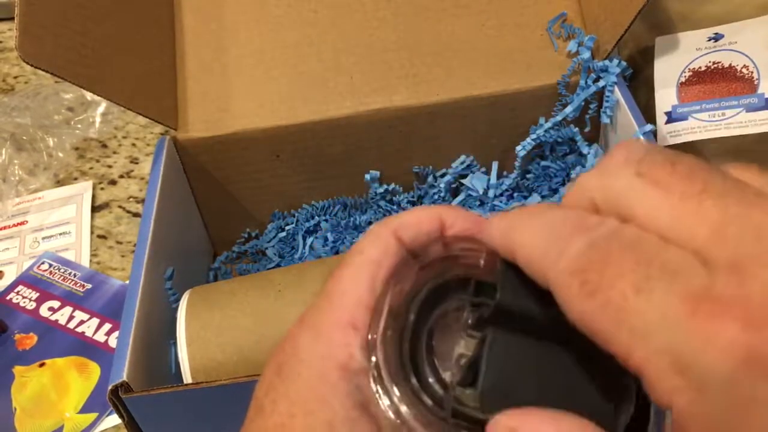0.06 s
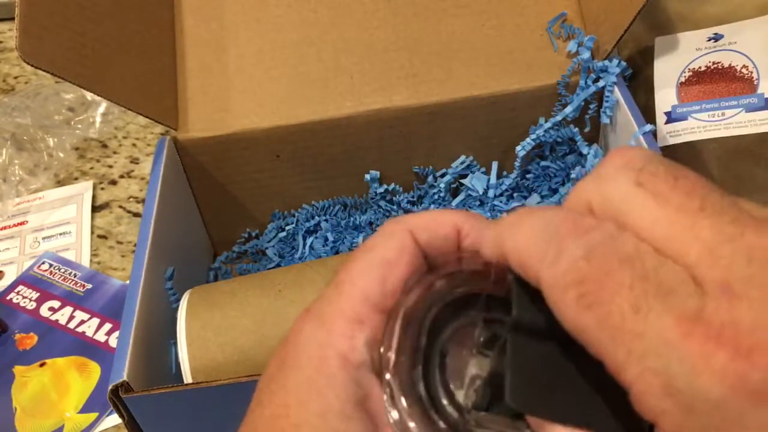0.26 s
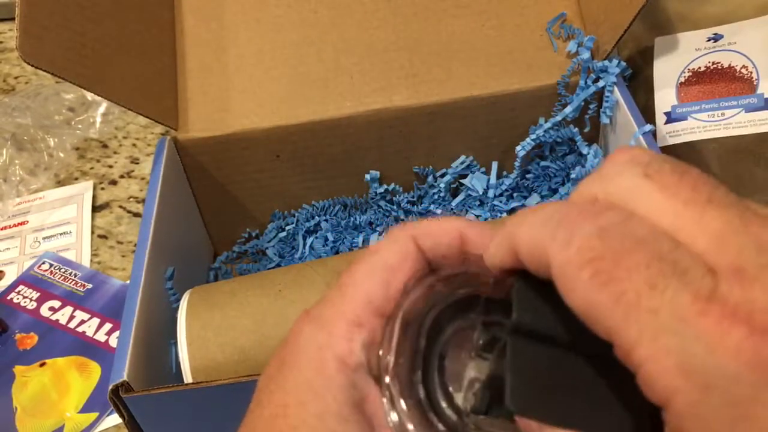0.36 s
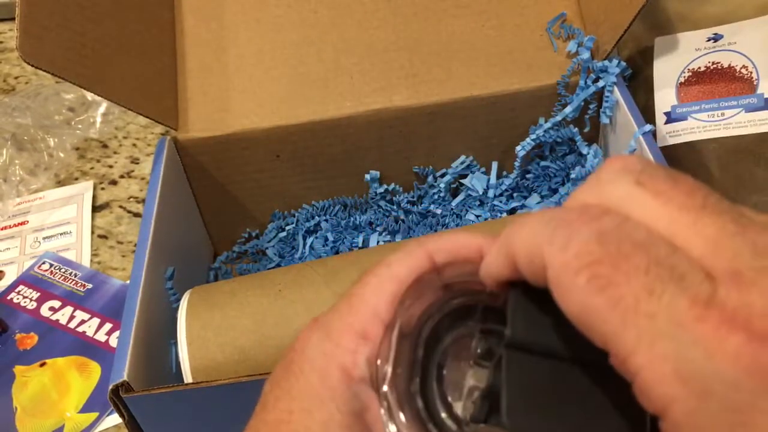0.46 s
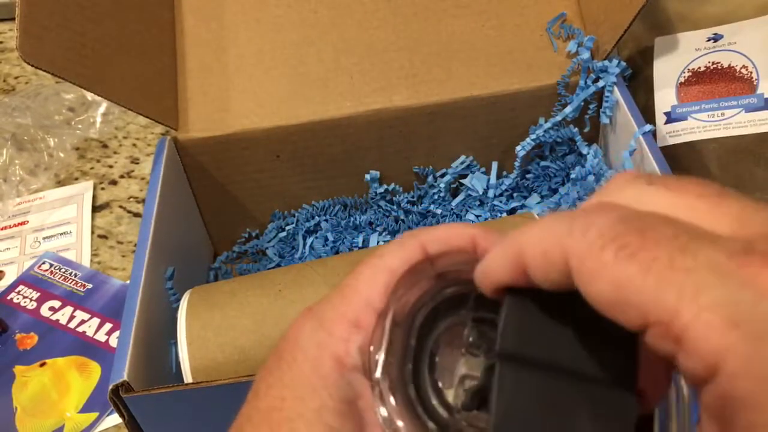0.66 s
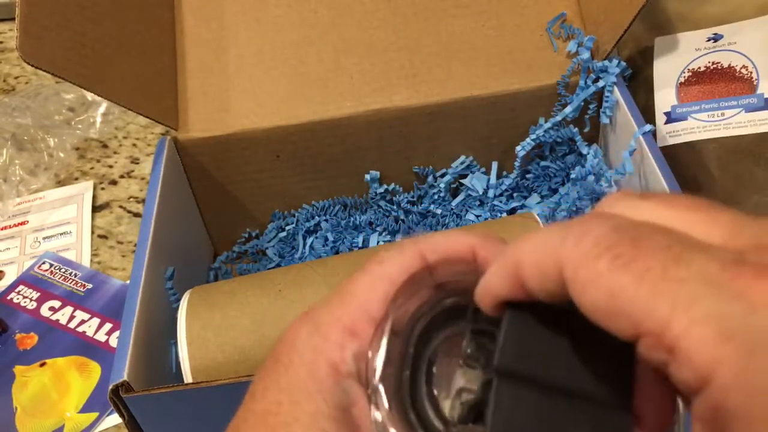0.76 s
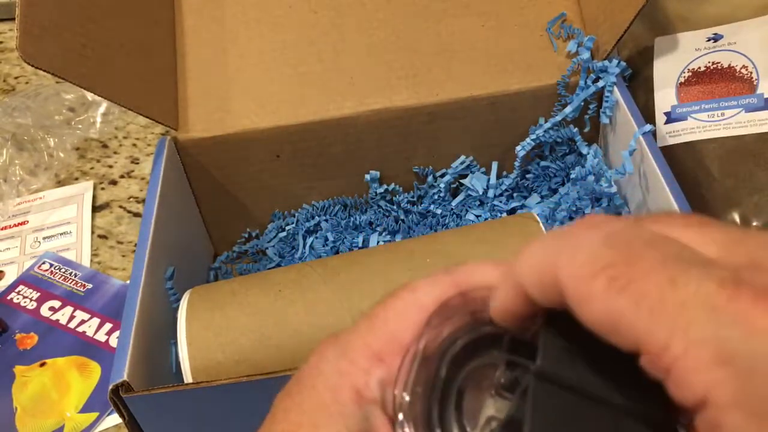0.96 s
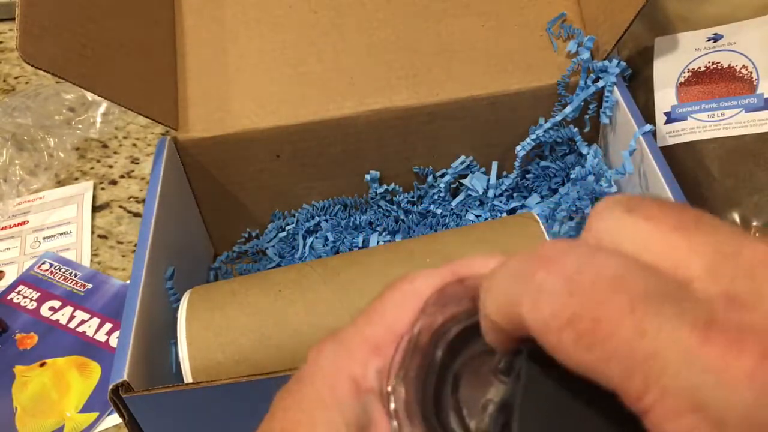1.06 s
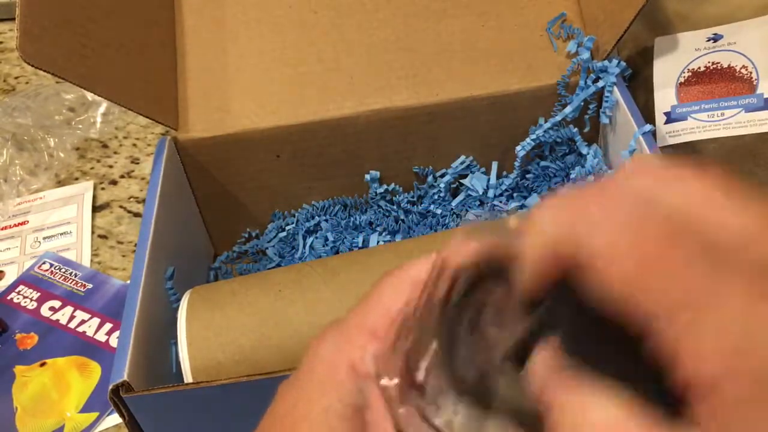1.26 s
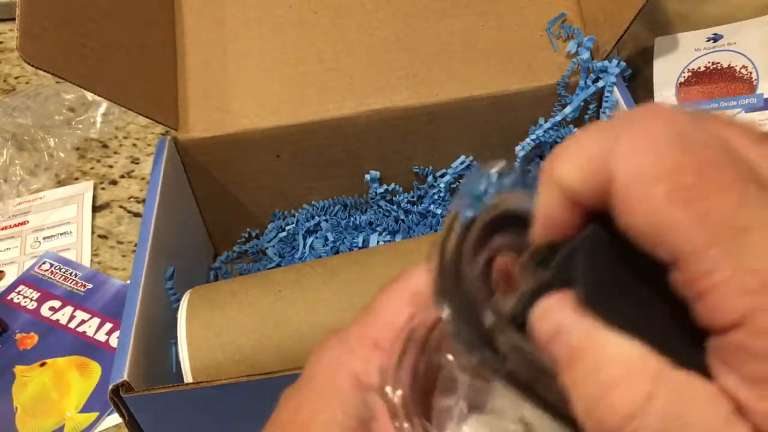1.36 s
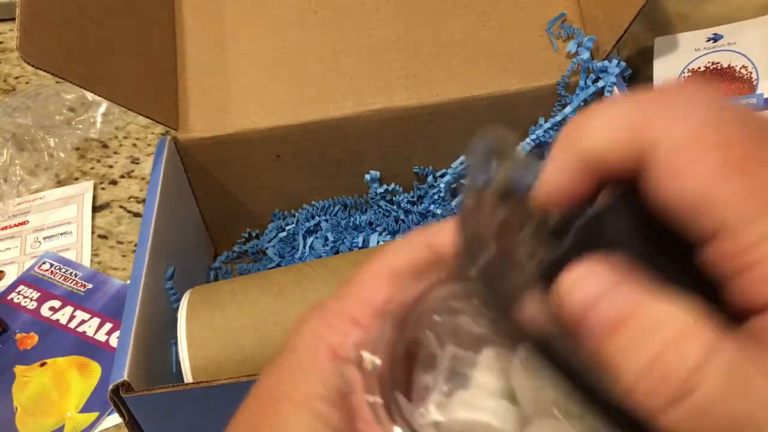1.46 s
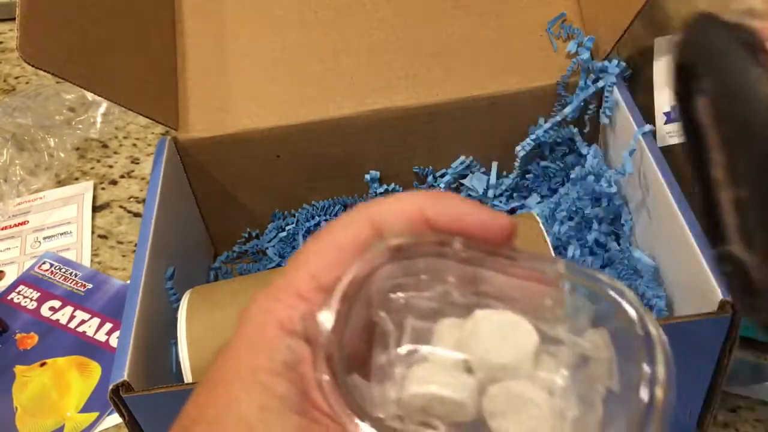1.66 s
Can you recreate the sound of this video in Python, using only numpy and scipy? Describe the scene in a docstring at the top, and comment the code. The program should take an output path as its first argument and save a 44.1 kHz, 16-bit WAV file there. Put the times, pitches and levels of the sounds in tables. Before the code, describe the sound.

A small plastic tub is opened by hand: faint ticks, one loud sharp snap, sparse clicks and a tiny creak, then rubbing and rattling as the lid comes off, close to the microphone in a quiet furnished room.

```python
"""First a soft rub and faint ticks, then one loud snap: hands work the lid off a small plastic tub, close up.
After the snap the lid ticks and creaks on its rim, then comes away with rubbing and rattling.
Snap, ticks and creak are short pushes that ring the modes of tub and lid; rubbing feeds the same modes
with dense random slips. Decaying noise makes the echo of a quiet furnished room, over hum and faint hiss."""
import sys
import numpy as np
from scipy import signal
from scipy.io import wavfile

SR = 44100
rng = np.random.default_rng(int(sys.argv[2]) if len(sys.argv) > 2 else 0)


def unload_wav(signal):
    """Save mono or channel-first audio to the path in sys.argv[1] as 16-bit WAV at rate SR, clipped to [-1, 1]."""
    wavfile.write(
        sys.argv[1],
        SR,
        np.round(np.clip(np.atleast_2d(signal).T, -1, 1) * 32767).astype(np.int16),
    )


N = 74970  # length [samples]

# The lid's catch snaps loose and rebounds:
# (time [s], drive of the five mode groups from low to treble [dB] x 5, favoured pitch [Hz])
SNAP_CONTACTS = [(0.2335, -44.5, -18.5, -16, -14, -17, 3070), (0.2365, -35.5, -23.5, -9.5, -17, -19, 4375),
                 (0.2425, -67, -25.5, -32, -25, -40.5, 1370)]
# Tone curve of the snap: (frequency [Hz], boost or cut [dB])
SNAP_COLOUR = [(120, 10.5), (330, 4), (680, -28), (900, -7.5), (1080, 4), (1370, 8), (1550, -5),
               (2000, -13), (3070, -1.5), (3500, 1.5), (4150, -0.5), (6500, -0.5), (8500, 7), (11000, -2)]
# Light ticks and knocks of the lid:
# (time [s], drive of the five mode groups from low to treble [dB] x 5, favoured pitch [Hz])
TICK_CONTACTS = [(0.0241, -89, -46, -37, -39, -51, 3990), (0.032, -77, -48, -35.5, -44, -60, 1570),
                 (0.0366, -45, -61, -47, -48.5, -51.5, 2960), (0.0598, -48.5, -39.5, -50, -75, -67, 460),
                 (0.1288, -55, -48, -49, -45.5, -50, 1000), (0.2099, -50, -45, -54, -48.5, -54, 3140),
                 (0.2215, -60, -52, -52, -52, -57, 8700), (0.287, -46, -41, -57, -74, -78, 288),
                 (0.4978, -50, -24, -22.5, -24, -39.5, 2030), (0.5000, -37.5, -39.5, -36, -32.5, -44, 347),
                 (0.5073, -36, -41.5, -49, -57, -67, 2210), (0.6634, -51.5, -65, -44.5, -43, -54, 1853),
                 (0.7316, -54.5, -63, -35, -43.5, -57, 1445), (0.7492, -50, -70, -41, -44, -58, 2890),
                 (0.803, -65.5, -66, -49, -55.5, -62, 3240), (0.9882, -55.5, -61.5, -50, -61, -71, 3100),
                 (1.161, -50.5, -52, -49, -53, -56.5, 3100), (1.1919, -51.5, -50, -53, -50, -60, 3435),
                 (1.317, -55, -48.5, -45, -48.5, -55, 3520), (1.3328, -47.5, -34, -36, -44.5, -54, 680),
                 (1.3350, -36.5, -55, -49, -40.5, -46.5, 232), (1.3427, -56.5, -38, -52, -41, -50, 680),
                 (1.3814, -64, -33.5, -38, -50.5, -65, 857), (1.3941, -52, -51, -47, -46.5, -44, 1140),
                 (1.4046, -75, -47, -33, -68, -63, 1010), (1.4524, -66, -53, -37, -55, -58, 990),
                 (1.4595, -81, -40, -32.5, -38.5, -43.5, 1290),
                 (1.4926, -46.5, -34, -40, -41.5, -32.5, 4450), (1.6248, -64.5, -50.5, -51, -50, -43, 1350)]
# The lid creaks on the rim, slip by slip: (time [s], level [dB])
CREAK_SLIPS = [(0.947, -46), (0.9598, -46.5), (0.9665, -47), (.972, -51), (0.98, -48)]
# Tone of a creak slip, one value per mode group from low to treble: (offset [dB])
CREAK_COLOUR_DB = [2, -6, 0, -1, -1.5]
# Strokes of skin and lid rubbing on the rim:
# (start [s], length [s], level [dB], tilt about 1 kHz [dB per octave], favoured pitch [Hz])
RUB_STROKES = [(0, 0.055, -55.5, -2, 1570), (0.425, 0.093, -52.5, -6, 1130),
               (0.676, 0.053, -53, -3.5, 2000), (0.711, 0.06, -51, -1, 1400), (0.749, 0.11, -58, -3, 2010),
               (0.843, 0.15, -56, -5, 2730), (0.948, 0.091, -56.5, -3.5, 310),
               (1.033, 0.25, -60.5, -3, 3870), (1.32, 0.043, -40, -4.5, 3460),
               (1.341, 0.054, -46.5, -4, 700), (1.37, 0.074, -40.5, -3, 1050), (1.433, 0.088, -43, -2, 935),
               (1.468, 0.11, -55, -6, 2004), (1.6, 0.055, -50, -3, 1405)]
# Modes of tub and lid: (frequency [Hz], relative strength when struck [dB], t60 [s])
TUB_MODES = [(120, 1.5, 0.011), (232, 5.5, 0.012), (314.8, 10, 0.02), (466.4, 4, 0.007), (680, -6.5, 0.022),
             (868, 0.5, 0.0079), (1033, 1.5, 0.019), (1370, -1.5, 0.01), (1506, 5.5, 0.0056),
             (1846, 3.5, 0.0081), (2246, -1.5, 0.013), (2610, 2, 0.008), (3070, 2, 0.0086),
             (3496, 3, 0.007), (4203, -3, 0.015), (4630, -4.5, 0.0088), (5635, 3.5, 0.0039),
             (6530, -1, 0.0083), (7650, 3, 0.0024), (8730, -2.5, 0.004), (9710, -7.5, 0.0065),
             (11210, -6.5, 0.0056), (12200, -7, 0.0093), (13500, -8.5, 0.0033), (15000, -6, .0025)]
# Borders between the five mode groups: (frequency [Hz])
GROUP_EDGES_HZ = [500, 1150, 2500, 5000]
# Room echo band by band: (frequency [Hz], level [dB], t60 [s])
ROOM_BANDS = [(197, -34, 0.34), (400, -40.5, 0.25), (700, -32.5, 0.19), (1050, -36, 0.32),
              (1340, -31, 0.34), (1655, -40, 0.51), (2420, -32.5, 0.32), (3460, -38.5, 0.4),
              (4466, -38.5, 0.3), (8000, -33.5, 0.27), (11960, -36.5, 0.18), (15000, -28, 0.26)]
# Spectrum of the room tone: (frequency [Hz], relative level per Hz [dB])
FLOOR_SPECTRUM = [(20, -73), (40, -49.5), (58, -9), (80, 4.5), (110, 7.5), (200, -2), (476, -7.5),
                  (677, -23), (1020, -12), (1440, -25.5), (1940, -10.5), (2400, -30.5), (3160, -20.5),
                  (5500, -32.5), (8000, -43.5), (12900, -36), (16000, -68)]

CREAK_PITCH_HZ = 9800  # pitch that the slips favour
MODE_SPREAD_DB = 3  # how much a mode's strength varies from touch to touch
FAVOUR_DB, FAVOUR_OCTAVES = 9.5, 0.2  # lift of the modes nearest a favoured pitch, and its reach
CONTACT_CYCLES = 0.16  # the push on a mode decays with a time constant of half this share of its period
CHATTER_S, CHATTER_DB = 0.0013, -10  # each contact repeats twice: longest gap, level step per repeat
CHATTER_BASS_DB = -15  # extra step for the lowest group: chatter is too light to move it
RUB_PER_S, RUB_SPREAD_DB, RUB_BASS_DB = 36000, 3, -12.5  # slip rate, size spread, lowest group
RUB_RISE = 0.29  # share of a stroke spent swelling
SCATTER_RING = 0.42  # heard from all sides, the snap's modes blur: share of their ring time
CUPPED_DB = -10.5  # the hands shield the small sounds from the room
ROOM_ONSET_S = 0.002  # time constant of the echo's swell
LATE_DB, LATE_T60_S = -21, 1.1  # a weaker, slower second tail
FLOOR_DB, FLOOR_PATCHY_DB = -57, 3.5  # room tone level, and how far each band wavers
HUM_HZ, HUM_WIDTH_HZ, HUM_DB = 58, 7, -58.5
HISS_HZ, HISS_WIDTH_HZ, HISS_DB = 6690, 520, -74
MIC_LOW_HZ, CUTOFF_HZ, CEILING = 44.9, 16600, 1.3  # bass corner, top stop edge, peak limit


def snap():
    """The catch lets go and rebounds, striking the modes hard."""
    return blows(SNAP_CONTACTS, SNAP_COLOUR)


def snap_echo():
    """The snap spreads into the room with blurred modes; each contact takes its own echo paths."""
    echo = np.zeros(N)
    for contact in SNAP_CONTACTS:
        echo += room(blows([contact], SNAP_COLOUR, SCATTER_RING, spread_db=1))
    return echo


def ticks():
    """Light touches of the lid strike the same modes."""
    return blows(TICK_CONTACTS)


def creak():
    """The lid sticks and slips on the rim; each slip strikes the modes with one shared tone."""
    return blows([(s, *(db + np.array(CREAK_COLOUR_DB)), CREAK_PITCH_HZ) for s, db in CREAK_SLIPS])


def rubbing():
    """Dense tiny slips dealt at random to the modes; strokes swell and fade, each with its own tone."""
    sizes = from_db(RUB_SPREAD_DB * np.minimum(rng.exponential(1, N), 5))
    signs = rng.choice([-1, 1], N)
    slips = sizes * signs * (rng.random(N) < RUB_PER_S / SR)
    dealt = rng.integers(0, len(TUB_MODES), N)  # which mode each slip drives
    t, out = np.arange(N) / SR, np.zeros(N)
    shapes = [np.interp(t, [s, s + RUB_RISE * length, s + length], [0, 1, 0])
              for s, length, *_ in RUB_STROKES]
    for k, (hz, _, t60) in enumerate(TUB_MODES):
        gain = np.zeros(N)
        for shape, (_, _, db, tilt, pitch_hz) in zip(shapes, RUB_STROKES):
            gain += shape * from_db(db + tilt * np.log2(hz / 1000) + favour(hz, pitch_hz))
        bass = from_db(RUB_BASS_DB * (hz < GROUP_EDGES_HZ[0]))
        ringing = rms_one(ring(slips * (dealt == k), hz, t60))
        out += bass * gain * ringing / np.sqrt(len(TUB_MODES))
    return out


def blows(contacts, colour=((1, 0),), ring_share=1, spread_db=MODE_SPREAD_DB):
    """Contacts and their brief chatter strike every mode, weighted by group, colour and favoured pitch."""
    rows, out = np.array(contacts), np.zeros(N)
    colour_hz, colour_db = np.transpose(colour)
    chance = rng.standard_normal((len(rows), 3, len(TUB_MODES)))
    lag = np.cumsum(rng.uniform(0.77, 1, (len(rows), 3)), axis=1) * CHATTER_S
    at = ((rows[:, :1] + lag - lag[:, :1]) * SR).astype(int)  # contact and two repeats
    for k, (hz, mode_db, t60) in enumerate(TUB_MODES):
        drive_db = rows[:, 1 + np.searchsorted(GROUP_EDGES_HZ, hz)]
        level = drive_db + mode_db + np.interp(np.log(hz), np.log(colour_hz), colour_db)
        level = level + favour(hz, rows[:, -1])
        step_db = CHATTER_DB + CHATTER_BASS_DB * (hz < GROUP_EDGES_HZ[0])
        level = level[:, None] + step_db * np.arange(3)
        sign = (-1) ** k  # neighbouring modes start in opposite directions
        clicks = np.zeros(N)
        np.add.at(clicks, at, sign * from_db(level + spread_db * chance[:, :, k]))
        out += ring(clicks, hz, t60 * ring_share) / np.sqrt(ring_share)
    return out


def favour(hz, pitch_hz):
    """Lift in dB of a mode near the pitch that a contact favours."""
    return FAVOUR_DB * np.exp(-(np.log2(hz / pitch_hz) / FAVOUR_OCTAVES) ** 2)


def ring(clicks, hz, t60):
    """Softened clicks push a resonator into a decaying sine."""
    r = from_db(-60 / (t60 * SR))  # decay per sample
    w = 2 * np.pi * hz / SR
    soft = np.exp(-2 * hz / SR / CONTACT_CYCLES)
    pushed = signal.lfilter([1 - soft], [1, -soft], clicks + 1e-18)  # tiny offset avoids denormals
    return signal.lfilter([0, np.sin(w)], [1, -2 * r * np.cos(w), r * r], pushed)


def room(x):
    """Diffuse echo: noise that swells briefly and dies band by band, with a faint longer tail."""
    t, response = np.arange(SR) / SR, np.zeros(SR)
    hz = np.array(ROOM_BANDS)[:, 0]
    edges = np.r_[hz[0] / 1.5, np.sqrt(hz[1:] * hz[:-1]), hz[-1] * 1.2]
    swell = 1 - np.exp(-t / ROOM_ONSET_S)
    for (_, db, t60), low, high in zip(ROOM_BANDS, edges, edges[1:]):
        fade = from_db(db - 60 * t / t60) + from_db(db + LATE_DB - 60 * t / LATE_T60_S)
        response += band(rng.standard_normal(len(t)), low, high) * fade * swell
    return signal.fftconvolve(x, response)[:N]


def room_tone():
    """Third-octave bands of noise that waver a little, a low hum and a narrow hiss."""
    edges = 20 * 2 ** np.arange(0, 10, 1 / 3)
    white = rng.standard_normal((4, N + SR))  # the first second lets the filters settle
    hz, db = np.transpose(FLOOR_SPECTRUM)
    floor = np.zeros(N)
    for k, (low, high) in enumerate(zip(edges, edges[1:])):
        level = np.interp(np.log(low * high) / 2, np.log(hz), db)
        wavering = from_db(level + FLOOR_PATCHY_DB * drift(6.6))
        floor += band(white[k % 2], low, high)[SR:] * wavering
    hum = rms_one(band(white[2], HUM_HZ - HUM_WIDTH_HZ / 2, HUM_HZ + HUM_WIDTH_HZ / 2)[SR:])
    hiss = rms_one(band(white[3], HISS_HZ - HISS_WIDTH_HZ / 2, HISS_HZ + HISS_WIDTH_HZ / 2)[SR:])
    return from_db(FLOOR_DB) * rms_one(floor) + from_db(HUM_DB) * hum + from_db(HISS_DB) * hiss


def drift(rate):
    """Slow random wander with unit rms: noise smoothed by two equal poles, at 1/40 of the sample rate."""
    r = np.exp(-80 * np.pi * rate / SR)
    noise = rng.standard_normal(N // 40 + 2002)
    slow = signal.lfilter([1], [1, -2 * r, r * r], noise)[2000:]
    return np.interp(np.arange(N) / 40, np.arange(len(slow)), rms_one(slow))


def band(x, low_hz, high_hz):
    """Butterworth band-pass."""
    return signal.sosfilt(signal.butter(2, [low_hz, high_hz], "band", fs=SR, output="sos"), x)


def from_db(db):
    """Decibels to gain."""
    return 10 ** (np.asarray(db) / 20)


def rms_one(x):
    """Scale to unit rms."""
    return x / np.sqrt(np.mean(x ** 2) + 1e-20)


def scene():
    """Tub close up, its echo and the room tone."""
    small = ticks() + creak() + rubbing()
    small_echo = room(from_db(CUPPED_DB) * small)
    return (snap() + small + snap_echo() + small_echo + room_tone())[None]


def record(dry):
    """The microphone drops the deepest bass, peaks are rounded, then the top is cut steeply."""
    high_pass = signal.butter(3, MIC_LOW_HZ, "high", fs=SR, output="sos")
    top_cut = signal.cheby2(14, 70, CUTOFF_HZ, fs=SR, output="sos")
    x = signal.sosfilt(high_pass, dry)
    rounded = CEILING * np.tanh(x / CEILING)
    return signal.sosfilt(top_cut, rounded)


dry = scene()
out = record(dry)
unload_wav(out)
```